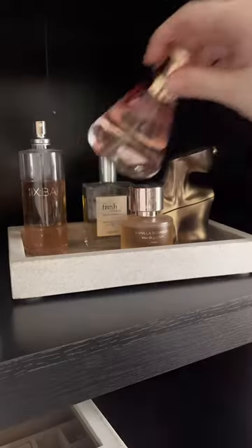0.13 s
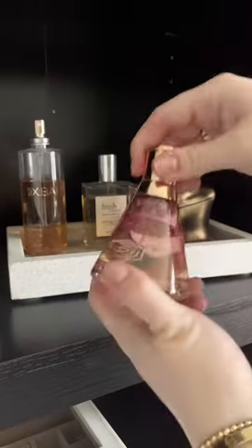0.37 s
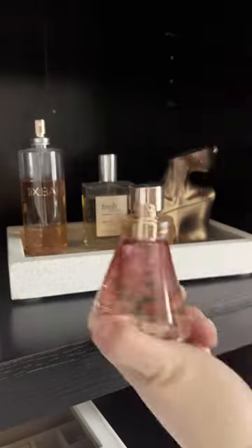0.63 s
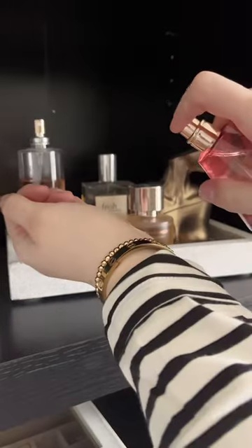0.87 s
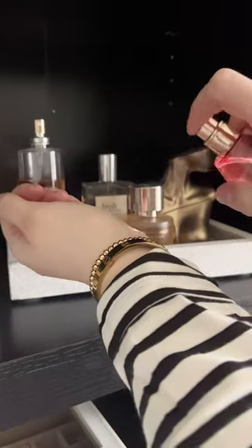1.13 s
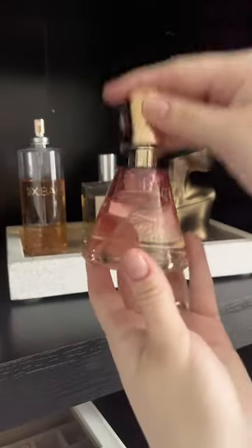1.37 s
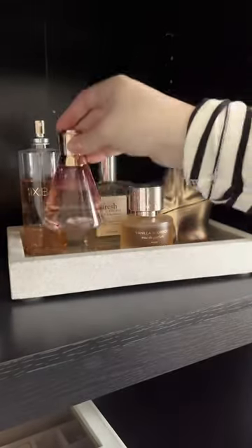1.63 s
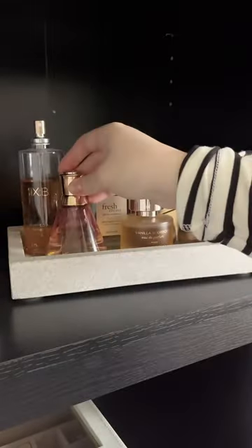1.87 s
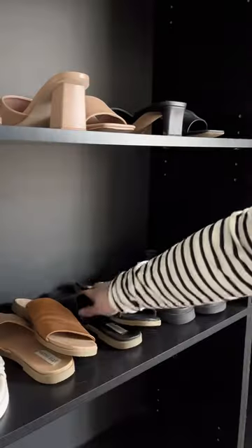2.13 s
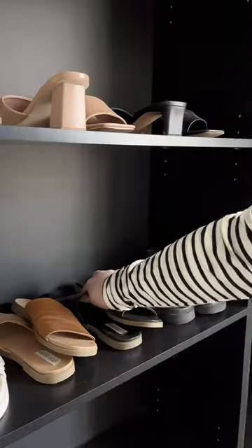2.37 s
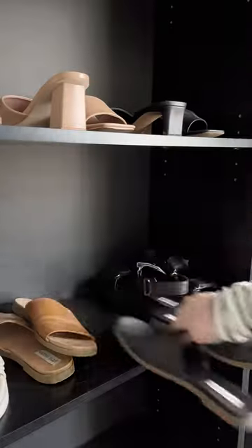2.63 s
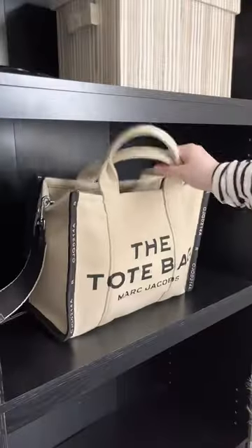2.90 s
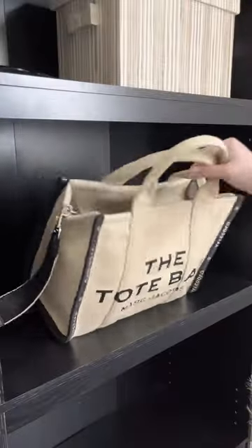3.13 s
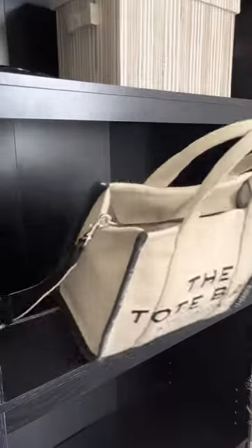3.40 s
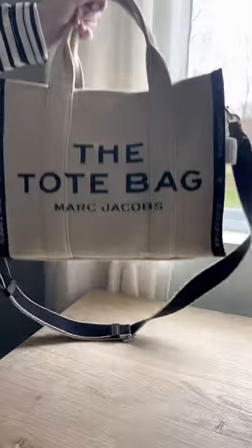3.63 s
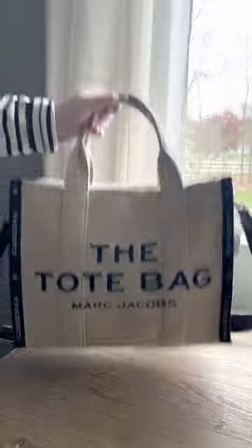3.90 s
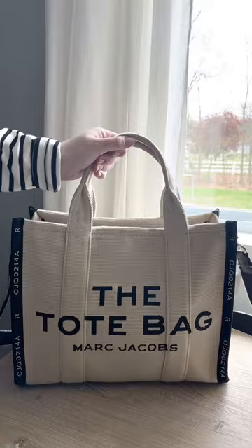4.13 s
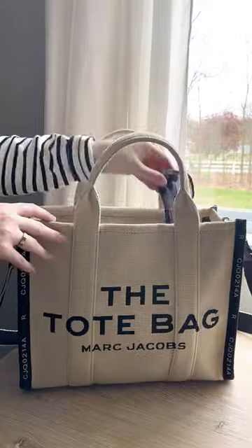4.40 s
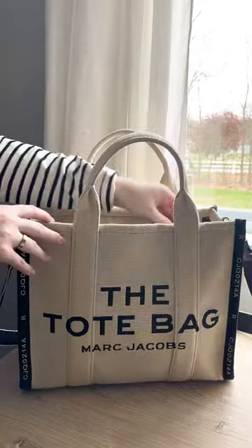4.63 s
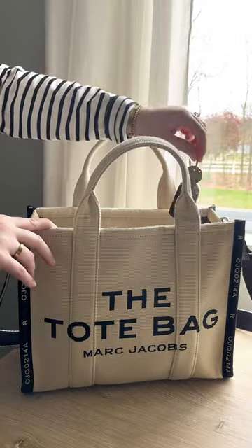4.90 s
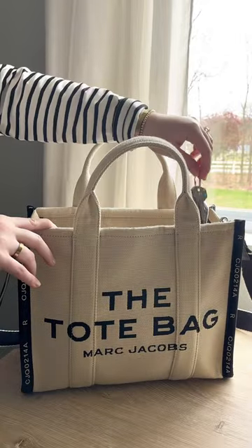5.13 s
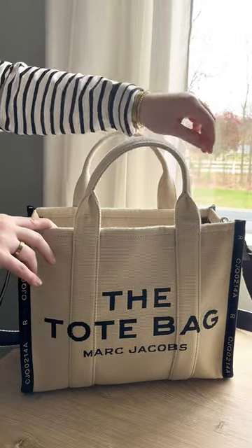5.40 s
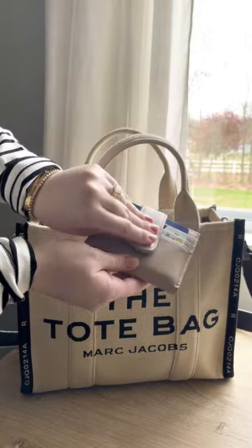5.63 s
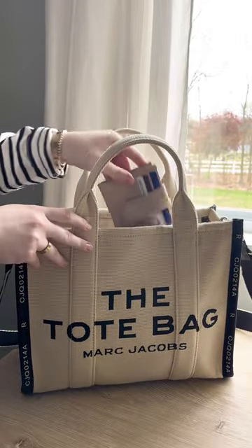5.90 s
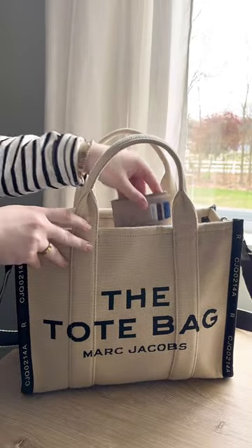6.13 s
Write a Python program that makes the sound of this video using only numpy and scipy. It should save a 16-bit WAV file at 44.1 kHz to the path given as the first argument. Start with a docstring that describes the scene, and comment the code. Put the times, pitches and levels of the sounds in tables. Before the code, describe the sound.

Close, quick-cut indoor handling sounds: perfume bottle uncapped, sprayed, recapped and set down clinking, sandals shuffled, canvas bag scraped and thumped down, keys jingling.

```python
"""A quiet bedroom, close to a phone, in quick cuts: a perfume bottle is lifted, uncapped, sprayed, capped and
set on a wooden tray; sandals and a canvas bag slide off a shelf, the bag lands on a table, glasses, keys and a
wallet go in. Contacts are noise bursts; wood, glass and keys ring as clusters of decaying sines; rubbing is
gritty noise through resonances; the pump is stick-slip pulses, then shaped noise.
Each cut chops the room's tail and has its own hush of rumble, drone and hiss."""
import sys
import numpy as np
from scipy import signal
from scipy.fft import rfft, irfft, next_fast_len
from scipy.io import wavfile
from scipy.ndimage import uniform_filter1d

SR = 44100
rng = np.random.default_rng(int(sys.argv[2]) if len(sys.argv) > 2 else 0)


def volts_from_decibels(level):
    """Turn decibel levels (scalar or array-like) into linear amplitude factors."""
    exponent = np.asarray(level, float) / 20
    return 10 ** exponent


def to_wav(sig):
    """Store sig (one row per channel, or 1-D mono) as 16-bit WAV at the path in sys.argv[1].

    Samples outside -1..1 are clipped; the rate is SR.
    """
    pcm = np.clip(np.atleast_2d(sig), -1, 1) * 32767
    pcm = np.round(pcm).astype(np.int16)
    wavfile.write(sys.argv[1], SR, pcm.T)  # frames by channels


N = 276551  # samples

# shots between cuts: (start [s], end [s], rumble [dB], drone [dB], hiss [dB])
SHOTS = [(0, 0.349, -61, -95, -64.5), (0.353, 0.723, -59, -86, -66.5), (0.725, 1.165, -52, -49, -70.5),
         (1.182, 1.528, -53, -54, -71.5), (1.533, 2, -46.5, -48.5, -62), (2.005, 2.705, -48, -57, -64),
         (2.713, 3.609, -40, -48, -52.5), (3.634, 4.22, -50, -51.5, -67.5), (4.222, 4.725, -52, -56.5, -71),
         (4.731, 5.101, -52, -58.5, -68.5), (5.105, 5.527, -48, -59, -66), (5.533, 5.904, -53.5, -57, -69),
         (5.909, 6.309, -53, -59, -69.5)]
# modes of the tray: (frequency [Hz], level [dB], t60 [s])
TRAY = [(76, -9.5, 0.32), (144, -8, 0.43), (242.2, -3, 0.35), (310, 0, 0.12), (404, -18, 0.21),
        (610, -10.5, 0.15)]
# modes of the shelf: (frequency [Hz], level [dB], t60 [s])
SHELF = [(47.1, -33.5, 0.76), (78.5, -11.5, 0.31), (140.8, -7, 0.3), (207.1, -5, 0.29), (266, 0, 0.23),
         (363, 0.5, 0.097), (467, 0.5, 0.067), (726, -6.5, 0.36)]
# modes of the table: (frequency [Hz], level [dB], t60 [s])
TABLE = [(48, -10.5, 0.23), (80, -17, 0.94), (130, -1, 0.21), (176, -3.5, 0.2), (251, -1, 0.075),
         (331.5, -4.5, 0.3), (389, -3, 0.046), (544.6, -5.5, 0.18), (760, -9, 0.053)]
# wood under the blows and rubs: (from [s], modes)
WOOD = [(0, TRAY), (2, SHELF), (3.62, TABLE)]
# modes of the glass bottles: (frequency [Hz], level [dB], t60 [s])
BOTTLES = [(733, -9, 0.25), (1150, -6, 0.15), (1330, -9, 0.17), (1670, 5, 0.3), (2130, -3, 0.363),
           (2320, -0.5, 0.3), (2695, 1, .45), (2858, 1, 0.35), (3300, -11.5, .3), (3690, 5.5, 0.22),
           (4000, 5.5, 0.28), (4030, 0, 0.4), (4380, -3.5, 0.9), (4846, -8.5, .25), (4860, -5.5, .31),
           (5335, 2, .3), (5700, -15, .15), (6374, -22.5, 0.2), (7671, -23.5, 0.447), (8800, -18.5, .33)]
# modes of the keys: (frequency [Hz], level [dB], t60 [s])
KEYS = [(2150, -24, .04), (2450, -24, .05), (3050, -22, .05), (4050, -22, .05), (4700, -22, .05),
        (6340, -18, .08), (6800, -15, .08), (7140, -14, .15), (8200, -14, .12), (8870, -16, .12),
        (9540, -7, .12), (10400, -6, .05), (11100, -2, .2), (12000, -11, .15), (12900, -14, .12),
        (14800, -12, .12), (15400, -3, .22)]


def along(table, hz):
    """A (Hz, value) table read on a log-frequency axis."""
    f, v = np.transpose(table)
    return np.interp(np.log(hz + 1), np.log(f), v)


def noise(spectrum, size):
    """Noise of rms 1, coloured by (frequency [Hz], relative level [dB])."""
    n = next_fast_len(size)
    gain = volts_from_decibels(along(spectrum, np.fft.rfftfreq(n, 1 / SR)))
    x = irfft(rfft(rng.standard_normal(n)) * gain, n)[:size]
    return x / x.std()


def band(x, hz, width):
    """Resonance with gain 1 at the centre."""
    return signal.lfilter(*signal.iirpeak(hz, hz / width, SR), x)


def steep(x, hz, width):
    """Two equal resonances in series, for dark skirts; each is 1.34 times the nominal width."""
    return band(band(x, hz, 1.34 * width), hz, 1.34 * width)


def walk(rate):
    """Random levels drawn rate times a second, joined by ramps; spread near 1."""
    k = int(SR / rate)
    return uniform_filter1d(np.repeat(rng.standard_normal(N // k + 1), k), k)[:N]


def cut_after(s):
    """When the shot that holds time s ends."""
    return min(end for start, end, *hush_db in SHOTS if end > s)


def add(out, s, x):
    """Mixes x into out at time s, up to the next cut."""
    i, stop = int(s * SR), min(int(cut_after(s) * SR), N)
    out[i:min(i + len(x), stop)] += x[:stop - i]


def curve(table):
    """Columns of a table at every sample, and a gate that is open while it lasts."""
    s, *columns = np.transpose(table)
    t = np.arange(N) / SR
    gate = np.clip(np.minimum(t - s[0], s[-1] - t) / 0.0031, 0, 1)
    return gate, *(np.interp(t, s, c) for c in columns)


def decays(rows, attack_s):
    """Gain that jumps at each (s, dB, t60 s) and dies away, at the latest with the cut."""
    out, t = np.zeros(N), np.arange(SR) / SR
    for s, db, t60 in rows:
        add(out, s, np.minimum(t / attack_s, 1) * volts_from_decibels(db - 60 * t / t60))
    return out


def favour(hz, centre_hz, db_per_octave):
    """Gain in dB, falling as a resonance lies further from the centre of the excitation."""
    return -db_per_octave * np.abs(np.log2(hz / centre_hz))


def blend(resonances, centre_hz, db_per_octave):
    """Mixes (Hz, dB, noise) to about rms 1; nearness to the centre adds to a resonance's share."""
    shares = [volts_from_decibels(db + favour(hz, centre_hz, db_per_octave)) for hz, db, x in resonances]
    mix = sum(share * x / x.std() for share, (hz, db, x) in zip(shares, resonances))
    return mix / np.sqrt(sum(share ** 2 for share in shares))


def ring(s, modes, db, push_ms, scatter_db, spread):
    """One blow: every mode is four close partials that beat; a longer push dulls the high ones."""
    hz, share_db, t60 = np.repeat(np.transpose(modes), 4, axis=1)[:, :, None]
    level_chance, pitch_chance = rng.standard_normal((2, *hz.shape))
    mode_chance = np.repeat(rng.standard_normal(len(modes)), 4)[:, None]
    share_db = share_db + scatter_db * (mode_chance + level_chance)
    t = np.arange(int(min(cut_after(s) - s, .5) * SR)) / SR
    partials = volts_from_decibels(share_db - 60 * t / t60) * np.sin(2 * np.pi * hz * (1 + spread * pitch_chance) * t)
    x = signal.fftconvolve(partials.sum(0), np.hanning(int(push_ms * SR / 1000) + 3))
    return volts_from_decibels(db) * x / np.abs(x).max()


def crack(db, hz, treble_db, body_db, ms):
    """A burst of noise: a broad knock around hz, a fizz of treble and a dull body."""
    t = np.arange(SR // 10) * 1000 / SR / max(ms, .2)
    fade = np.exp(-t) * (1 - np.exp(-t / 0.57))
    first_touch = 5.0 * (t == 0)
    knock = steep(first_touch + fade * rng.standard_normal(len(t)), hz, 0.67 * hz)
    fizz = fade * noise([(3000, -43.0), (6500, 3.5), (13000, 14.5), (16000, 2.5)], len(t))
    body = fade * noise([(200, -27), (500, 6.5), (1200, 4.5), (2500, -41.5)], len(t))
    return volts_from_decibels(db) * knock / np.abs(knock).max() + volts_from_decibels(treble_db) * fizz + volts_from_decibels(body_db) * body


def rattle(modes, shakes, rate, width):
    """Hundreds of tiny collisions a second excite an object's modes; width is a share of the pitch."""
    ticks = (rng.random(N) < rate / SR) * rng.standard_normal(N) * volts_from_decibels(3 * walk(60))
    jingle = sum(volts_from_decibels(db) * band(ticks, hz, width * hz) for hz, db, t60 in modes)
    return decays(shakes, 0.0018) * jingle / jingle.std()


def stereo(shared, other):
    """Stereo image: left and right are partly alike, with a phase between them that varies with pitch."""
    # (frequency [Hz], lead of the left channel [radians])
    left_lead = [(0, 0), (700, -0.3), (1400, -0.2), (1750, 0), (2400, 1.2), (3100, -1), (3900, -0.9),
                 (4500, -1.5), (5170, -4), (5700, -3.2), (6550, -2.4), (7580, -0.4), (8600, 0.5),
                 (9300, 2.3), (9800, 3.05), (10700, 3.5), (11200, 4.4), (12060, 6), (13100, 6.6),
                 (14470, 9.3), (15400, 10.4), (16000, 9.7)]
    # (frequency [Hz], likeness of left and right [0-1])
    likeness = [(60, .998), (130, .99), (280, .95), (640, .55), (1100, .65), (1700, .8), (2200, .55),
                (2700, .1), (3600, .55), (4600, .45), (5200, .5), (5800, .92), (7000, .65), (8200, .87),
                (10200, .96), (16000, .9)]
    n = next_fast_len(len(shared))
    hz = np.fft.rfftfreq(n, 1 / SR)
    alike = np.clip(along(likeness, hz), 0, 1)
    lead = np.exp(-1j * np.interp(hz, *np.transpose(left_lead)))
    right = alike * lead * rfft(shared, n) + np.sqrt(1 - alike ** 2) * rfft(other, n)
    return np.array([shared, irfft(right, n)[:len(shared)]])


def housing():
    """The phone's body scatters the direct sound: a short random response passing all pitches equally."""
    scatter_ms = 2.5
    x = rfft(rng.standard_normal(512) * np.exp(-np.arange(512) * 1000 / SR / scatter_ms))
    return irfft(x / np.abs(x))


def room(direct):
    """Direct sound, scatter off the near shelves, then the room's tail dying band by band."""
    # tail: (frequency [Hz], t60 [s], level [dB])
    tail = [(60, 0.11, -19), (306, 0.44, -6), (990, 0.64, -24), (4640, 0.2, -8), (8000, 1, -28),
            (15890, 0.45, -24)]
    near_db, near_ms = -14, 6
    t = np.arange(SR // 2) / SR
    scatter = noise([(200, -21.0), (800, 9.0), (6000, 4.5), (16000, -36.0)], len(t))
    h = volts_from_decibels(near_db) * np.exp(-t * 1000 / near_ms) * scatter / np.sqrt(near_ms * SR / 2000)
    f, t60, db = np.transpose(tail)
    for hz in 50 * 2 ** np.arange(0, 8.4, .5):  # half octaves
        fade_db = along(np.c_[f, db], hz) - 60 * t / along(np.c_[f, t60], hz)
        tail_band = band(rng.standard_normal(len(t)), hz, hz / 3) / np.sqrt(SR / 20)
        h += volts_from_decibels(fade_db) * np.minimum(t / 0.0028, 1) * tail_band
    h[:len(direct)] += direct
    return np.roll(h, 32)  # headroom for the phase between left and right


def hush():
    """Stereo background: wavering rumble, steady hiss, wavering drone, all coloured noise."""
    # (frequency [Hz], relative level [dB])
    rumble_colour = [(15, -29.5), (25, -5), (92, 4.5), (141, -9.5), (221, -11.5), (343, -22.5), (425, -20),
                     (569, -39.5), (600, -47.5), (780, -60), (1320, -120)]
    # (frequency [Hz], relative level [dB])
    hiss_colour = [(400, 7.5), (1000, 1), (2500, 0.5), (5000, 0.5), (6800, -3.5), (9000, -5),
                   (15000, -14.5)]
    # (frequency [Hz], relative level [dB])
    drone_colour = [(60, -43), (110, -4), (135, 5), (175, 0.5), (220, -20), (320, -46.5)]
    rumble = stereo(noise(rumble_colour, N), noise(rumble_colour, N)) * volts_from_decibels(2 * walk(72))
    hiss = stereo(noise([(150, -10)] + hiss_colour, N), noise([(150, -31.0)] + hiss_colour, N))
    drone = stereo(noise(drone_colour, N), noise(drone_colour, N)) * volts_from_decibels(2 * walk(20))
    return rumble, drone, hiss


def slides():
    """Things dragged, as (pitch centre Hz, course)."""
    # each: pitch centre [Hz], then a course of
    # (time [s], rub [dB], treble [dB], load on the wood [dB], favoured pitch of the wood [Hz])
    bottle = 4300, [(0.0, -67.5, -70, -62, 88.6), (.18, -56, -56.5, -76, 87.5),
              (.195, -52.5, -56.5, -61, 87.5), (0.3, -51.5, -58, -69, 85.5), (0.345, -55.5, -57, -60, 89)]
    # columns as for the bottle
    cap = 3800, [(1.283, -59, -65.5, -58.5, 140.4), (1.303, -44.5, -48, -56.5, 138.6),
           (1.307, -20, -26, -54, 141), (1.325, -22, -25.5, -60, 140), (1.346, -29, -23.5, -59.5, 140),
           (1.357, -34, -52.5, -57, 139.6)]
    # columns as for the bottle
    sandals = 1880, [(2.05, -40.5, -46, -69, 130), (2.086, -49.5, -57, -31.5, 130),
               (2.266, -60.5, -61.5, -68, 130), (2.308, -49, -50.5, -69, 130), (2.33, -55, -55, -43, 130),
               (2.516, -41.5, -45, -55, 130), (2.572, -40.5, -56, -35, 130),
               (2.602, -45.5, -54.5, -31.5, 130), (2.7, -65, -61, -55, 130)]
    # columns as for the bottle
    bag = 950, [(2.714, -26.5, -39.5, -27.5, 245), (2.738, -50, -54, -14, 266),
           (2.761, -45, -50.5, -20, 260), (2.77, -31, -33, -19, 260), (2.796, -43, -63, -37, 239),
           (2.898, -39.5, -42.5, -13.5, 247), (2.97, -54, -87, -26, 179), (3.212, -49.5, -44, -44, 119),
           (3.298, -39, -45.5, -49, 179), (3.388, -33, -45.5, -17, 152), (3.464, -28.5, -47.5, -48, 182),
           (3.522, -28, -45.5, -37, 140), (3.59, -23.5, -46, -31, 192), (3.63, -24.5, -28.5, -23, 187)]
    # columns as for the bottle
    keyring = 9000, [(4.74, -54, -54.5, -59, 115), (4.866, -55.5, -46.5, -49, 115),
               (4.96, -57, -78, -51.5, 115), (4.974, -60, -41, -49, 111), (5.1, -58.5, -54.5, -69, 113)]
    return [bottle, cap, sandals, bag, keyring]


def scuffs():
    """Brushes that swell into contact, as (pitch centre Hz, course)."""
    # (start [s], end [s], final rub [dB], final treble [dB], final load [dB], pitch centre [Hz])
    brushes = [(0.886, 0.92, -30, -56, -63, 3900), (1.75, 1.784, -9, -46.5, -33.5, 4003),
               (3.857, 3.904, -16, -39.5, -14.5, 1100), (4.638, 4.684, -65, -68.5, -28.5, 1000),
               (5.107, 5.199, -36, -36.5, -33, 950), (5.636, 5.647, -29.5, -39.5, -42.5, 3050),
               (6.207, 6.27, -56.5, -57, -44, 1600)]
    rise_db, load_rise_db, boom_hz = 38, 23, 265
    courses = []
    for start, end, db, treble_db, load_db, hz in brushes:
        first = (start, db - rise_db, treble_db - rise_db, load_db - load_rise_db, boom_hz)
        courses.append((hz, [first, (end, db, treble_db, load_db, boom_hz)]))
    return courses


def settling():
    """Things settling after they land (bag, keys, wallet): rubbing dies away while the wood's pitch sags."""
    # (time [s], rub [dB], load [dB], t60 [s], pitch centre [Hz])
    landings = [(3.629, -47, -41.5, 0.22, 957), (3.914, -24.5, -10.5, 0.4, 698),
                (4.042, -39.5, -54, 0.19, 3160), (4.681, -46.5, -27.5, 0.22, 960),
                (5.198, -31, -25.5, 0.37, 3660), (5.656, -32, -43.5, 0.38, 4230)]
    treble_db = -13  # relative to the rub
    boom_hz, settled_boom_hz = 260, 99
    courses = []
    for s, db, load_db, t60, hz in landings:
        cut_s = cut_after(s)
        lost_db = 60 * min((cut_s - s) / t60, 1)
        last_db = db - lost_db
        last = (min(s + t60, cut_s), last_db, last_db + treble_db, load_db - lost_db, settled_boom_hz)
        courses.append((hz, [(s, db, db + treble_db, load_db, boom_hz), last]))
    return courses


def rubbing():
    """Surfaces catch and slip: gritty noise through the rubbed thing's hollow, and a load that shakes the wood."""
    # resonances of the hollow: (frequency [Hz], nominal width [Hz], level [dB])
    rub_body = [(585, 540, 0.5), (950, 280, -3), (1400, 640, -1.5), (1844, 2800, -3), (2630, 780, -1),
                (4030, 1600, 0)]
    grit = volts_from_decibels(3 * walk(300) + 2.5 * walk(40))
    hollows = []
    for hz, width, db in rub_body:
        hollow = steep(grit * rng.standard_normal(N), hz, width)
        hollows.append((hz, db, hollow * volts_from_decibels(2.5 * walk(30))))
    treble = noise([(2500, -22.0), (4500, 3.5), (9000, -3.5), (14000, -4.5), (16000, -21.5)], N)
    treble = treble * volts_from_decibels(4 * walk(200))
    shake, out = rng.standard_normal(N), np.zeros(N)
    booms = {start: [(hz, db, steep(shake, hz, 6.14 / t60)) for hz, db, t60 in wood] for start, wood in WOOD}
    for centre_hz, course in slides() + scuffs() + settling():
        start_s, end_s = course[0][0], course[-1][0]
        boom = booms[max(start for start in booms if start <= start_s)]
        now = slice(int(start_s * SR), int(end_s * SR))
        gate, rub_db, treble_db, load_db, boom_hz = (c[now] for c in curve(course))
        body = blend([(hz, db, x[now]) for hz, db, x in hollows], centre_hz, 4.77)
        wood = blend([(hz, db, x[now]) for hz, db, x in boom], boom_hz, 13.0)
        out[now] += gate * (volts_from_decibels(rub_db) * body + volts_from_decibels(treble_db) * treble[now] + volts_from_decibels(load_db) * wood)
    return out


def taps():
    """Single-mode rings: metallic pings, cap taps and the low sway of the furniture."""
    # (time [s], frequency [Hz], level [dB], t60 [s])
    single_rings = [(0.319, 8630, -51, 0.078), (.322, 11000, -53, .05), (0.556, 12500, -29, 0.23),
                    (0.577, 1240, -34, 0.034), (0.587, 1200, -32, 0.095), (0.647, 12300, -52, 0.2),
                    (1.973, 1150, -38, 0.082), (2.983, 50, -18.5, 0.75), (3.916, 49, -22.5, 1),
                    (5.995, 1043, -60.5, 0.085), (6.146, 1200, -56.5, 0.1)]
    out = np.zeros(N)
    for s, hz, db, t60 in single_rings:
        add(out, s, ring(s, [(hz, 0, t60)], db, push_ms=0.5, scatter_db=1.4, spread=0.04))
    return out


def clicks():
    """Hard contacts, each a burst of noise."""
    # (time [s], knock peak [dB], centre [Hz], treble [dB], body [dB], decay [ms])
    contacts = [(0.3193, -40, 1900, -20.5, -72, 4.8), (0.478, -10.5, 2370, -17.5, -11, 1.6),
                (0.486, -10.5, 1730, -13.5, -15.5, 1.8), (0.555, -49, 1310, -29, -49, 2.4),
                (0.6441, -116, 1270, -34, -73, 3.6), (0.918, -3, 3100, -23, -14, 1.1),
                (0.995, -32, 3680, -25.5, -86, 2.5), (1.077, -32.5, 3880, -51.5, -61, 3.9),
                (1.11, -36, 3856, -52.5, -74, 6.5), (1.305, -1.5, 4160, -11, -17.5, 3.5),
                (1.3134, -1.5, 1700, -3.5, -19.5, 1.2), (1.3314, 4, 2960, -28.5, -33.5, 1),
                (1.3342, -6, 2960, -20, -27.5, 1.4), (1.3424, -0.5, 3000, -15, -15.5, 0.67),
                (1.5703, -22, 3370, -81, -33.5, 3.9), (1.607, -25, 3300, -42.5, -27.5, 4.8),
                (1.704, -29.5, 3900, -47.5, -43.5, 3.5), (1.7805, 4.5, 4200, -44.5, -15, 1.9),
                (2.05, -36, 1820, -36.5, -55, 1.2), (2.069, -26, 2500, -39, -27, 2.5),
                (2.105, -25.5, 1480, -48, -45, 1.2), (2.2139, -40.5, 1000, -55, -43, 3.1),
                (2.3315, -43, 1210, -61.5, -37, 4), (2.382, -35.5, 1160, -56, -49, 3),
                (2.299, -30.5, 1590, -52, -53, 3.2), (2.5541, -25, 1270, -58.5, -39.5, 5.1),
                (2.6129, -21, 3400, -59, -33, 4.4), (2.7182, -23, 1570, -45.5, -27.5, 5.4),
                (2.766, -10.5, 3930, -14.5, -43, 1.8), (2.84, -44, 1570, -46.5, -22, 1.1),
                (2.885, -16, 1950, -47, -21, 7.1), (3.3238, -19.5, 1280, -53, -13.5, 2.7),
                (3.3716, -44, 1276, -38, -15.5, 2.1), (3.8832, -10.5, 1165, -48, -4.5, 1.1),
                (3.9056, -1, 1740, -46.5, 3, 2.5), (4.0481, -43, 1400, -29, -30.5, 1.3),
                (4.6733, -40.5, 1220, -59, -18, 1.4), (5.1668, -31.5, 1516, -35.5, -48, 1.4),
                (5.1922, -32, 2560, -23.5, -23.5, 2.7), (5.2618, -14.5, 4260, -33.5, -33, 1.7),
                (5.534, -54.5, 4040, -73.5, -89, 1.8), (5.542, -46, 4100, -60.5, -81, 1.13),
                (5.561, -35.5, 3870, -66, -77, 0.73), (5.6531, 2, 3670, -11, -2, 1.3),
                (5.896, -55, 3590, -70.5, -66, 1.4)]
    out = np.zeros(N)
    for s, *row in contacts:
        add(out, s, crack(*row))
    return out


def thumps():
    """Soft blows that set the modes of the wood booming, most of all near a favoured pitch."""
    # (time [s], peak [dB], push [ms], favoured pitch [Hz])
    soft_blows = [(0.476, -29, 0.69, 82), (0.919, -40.5, 1.2, 267), (1.324, -25, 2.2, 140),
                  (1.577, -15.5, 2, 320), (1.608, -19, 2.6, 295), (1.712, -17.5, 2.2, 308),
                  (1.787, -13, 0.81, 222), (2.066, -30, 2.3, 134), (2.213, -25.5, 0.52, 91),
                  (2.334, -28.5, 1.8, 260), (2.564, -18, 1.06, 89), (2.723, -25.5, 0.9, 263),
                  (2.835, -14.5, 0.78, 265), (2.902, -20.5, 0.98, 260), (2.978, -6.5, 1.27, 175),
                  (3.331, -14.5, 2.2, 348), (3.377, -8, 1.9, 135.4), (3.874, -20, 1.4, 263.5),
                  (3.909, -2.5, 0.27, 510), (3.919, -4, 3.4, 138.5), (4.667, -24, 1.6, 322),
                  (5.114, -32, 0.66, 98.8), (5.169, -20.5, 0.43, 504), (5.188, -16.5, 1.1, 262),
                  (5.195, -16.5, 0.55, 500), (5.646, -37.5, 0.86, 359), (6.013, -39, 1.33, 121.6),
                  (6.13, -36, 1.73, 109)]
    out = np.zeros(N)
    for s, db, push_ms, centre_hz in soft_blows:
        wood = [wood for start, wood in WOOD if start <= s][-1]
        modes = [(hz, share_db + favour(hz, centre_hz, 11.0), t60) for hz, share_db, t60 in wood]
        add(out, s, ring(s, modes, db, push_ms, scatter_db=0.99, spread=0.039))
    return out


def pump():
    """The plunger creaks in stick-slip pulses, then the nozzle hisses."""
    # (start [s], end [s], level [dB], slip rate [1/s])
    creaks = [(0.728, 0.746, -23, 140), (0.757, 0.758, -30, 100), (0.7995, 0.865, -19, 97),
              (0.874, 0.895, -19, 98)]
    # resonances: (frequency [Hz], nominal width [Hz], level [dB])
    plunger = [(1800, 600, -9), (2800, 900, 0), (4300, 900, -1), (10500, 3000, -26.5)]
    # (time [s], level [dB], t60 [s])
    sprays = [(.918, -22, 0.16)]
    slip_jitter, slip_ms = .04, 2.9
    slips = np.zeros(N)
    for start, end, db, rate in creaks:
        size = int((end - start) * SR)
        phase = np.cumsum(rate * (1 + slip_jitter * walk(90)[:size])) / SR
        pulses = np.diff(np.floor(phase + 1), prepend=0)  # one at each whole turn
        add(slips, start, volts_from_decibels(db) * pulses * volts_from_decibels(3.0 * walk(213.3)[:size]))
    grind_fade = np.exp(-np.arange(600) * 1000 / SR / slip_ms)
    grind = np.convolve(slips, grind_fade)[:N] * rng.standard_normal(N)
    creak = sum(volts_from_decibels(db) * steep(slips + volts_from_decibels(-14) * grind, hz, width) for hz, width, db in plunger)
    hiss = noise([(800, -2.0), (2500, 8.0), (4500, 13.5), (6500, 10.0), (12000, 10.0), (16000, 0.5)], N)
    return creak + decays(sprays, 0.0034) * hiss


def bottle_knocks():
    """Knocked glass: short pushes ring the bottle modes."""
    # (time [s], peak [dB])
    knocks = [(1.568, -36.5), (1.603, -47), (1.778, -8.5), (1.798, -6), (1.86, -21.5), (1.888, -22)]
    out = np.zeros(N)
    for s, db in knocks:
        add(out, s, ring(s, BOTTLES, db, push_ms=.05, scatter_db=2, spread=0.012))
    return out


def bottle_chatter():
    """Bottles chatter against each other on the shaken tray, in dense random collisions."""
    # (time [s], level [dB], t60 [s])
    chatter = [(1.781, -11, 0.042), (1.799, -31, 0.59)]
    return rattle(BOTTLES, chatter, rate=900, width=0.015)


def scrape():
    """The bag's stiff base scrapes over the shelf edge: coarse grit knocks its modes, each waxing and waning."""
    # shriller as less of the base rests there: (time [s], level [dB], favoured pitch [Hz])
    course = [(3.15, -55, 1000), (3.2, -35, 1250), (3.26, -47, 1000), (3.318, -47, 900), (3.33, -35, 900),
              (3.42, -26, 950), (3.44, -23, 1100), (3.46, -23, 850), (3.497, -23, 1790), (3.53, -20, 1110),
              (3.556, -19.5, 1310), (3.575, -23, 1316), (3.59, -21, 1900), (3.63, -41, 1520)]
    # modes: (frequency [Hz], nominal width [Hz], level [dB])
    bag_base = [(728, 165, 0), (973, 64, -6.5), (1213, 61, -3), (1466, 100, -3.5), (1840, 120, -2),
                (2097, 200, 4), (2320, 170, -3.5), (2800, 170, -1.5), (3100, 140, -15), (4220, 250, -14.5)]
    gate, db, centre_hz = curve(course)
    grit = volts_from_decibels(5 * walk(250) + 3 * walk(70)) * rng.standard_normal(N)
    modes = [(hz, share_db, steep(grit, hz, width) * volts_from_decibels(2 * walk(40))) for hz, width, share_db in bag_base]
    return gate * volts_from_decibels(db) * blend(modes, centre_hz, 16.0)


def key_rattle():
    """The bunch of keys rattles after each shake, in dense random collisions."""
    # (time [s], level [dB], t60 [s])
    shakes = [(4.743, -40, 0.58), (4.86, -34.5, 0.19), (4.973, -54.5, 0.53), (5.101, -48.5, 0.69),
              (5.161, -34.5, 0.2), (5.195, -17, 0.21)]
    return rattle(KEYS, shakes, rate=720, width=.035)


def key_jingle():
    """Keys strike each other: high-passed metal modes and a crack at each strike."""
    # (time [s], ring peak ahead of the high-pass [dB], crack peak [dB], crack centre [Hz])
    strikes = [(4.7448, -19, -34, 2380), (4.7746, -21, -38.5, 2300), (4.7984, -22.5, -42, 2800),
               (4.819, -26.5, -34, 6500), (4.8367, -21, -29, 3520), (4.851, -36.5, -33, 3000),
               (4.8607, -15, -27.5, 7040), (4.8853, -21, -31, 6400), (4.923, -38, -43, 1320),
               (4.9712, -29.5, -21, 3100), (4.978, -32, -15, 4630), (4.996, -40, -23, 3300),
               (5.007, -32, -18.5, 4000), (5.0445, -31.5, -23, 4510), (5.0577, -41.5, -31.5, 2430),
               (5.072, -41, -39, 2470), (5.189, -17.5, -16, 3180), (5.1937, -9, -16, 9000),
               (5.2042, -16, -31, 4500)]
    rings, cracks = np.zeros(N), np.zeros(N)
    for s, db, crack_db, crack_hz in strikes:
        add(rings, s, ring(s, KEYS, db, push_ms=0, scatter_db=4.5, spread=.006))
        add(cracks, s, crack(crack_db, crack_hz, crack_db - 14, crack_db - 36, ms=2.5))
    return cracks + signal.sosfilt(signal.butter(2, 1200, "high", fs=SR, output="sos"), rings)


def scene():
    """Every shot has its own echo pattern and hush, and ends abruptly."""
    dry = rubbing() + taps() + clicks() + thumps() + pump() + bottle_knocks() + bottle_chatter()
    dry += scrape() + key_rattle() + key_jingle()
    layers = hush()
    out = np.zeros((2, N))
    for start, end, *layer_dbs in SHOTS:
        a, b = int(start * SR), min(int(end * SR), N)
        echoes = stereo(room([1]), room(housing()))
        heard = signal.fftconvolve(dry[None, a:b], echoes, axes=1)[:, 32:b - a + 32]  # undo the headroom
        for layer, db in zip(layers, layer_dbs):
            heard += volts_from_decibels(db) * layer[:, a:b]
        edge_s = np.minimum(np.arange(b - a) + 1, np.arange(b - a)[::-1] + 1) / SR
        out[:, a:b] = heard * np.minimum(edge_s / 0.0021, 1)
    return out


def roll_off(x):
    """The treble ends steeply here."""
    return signal.sosfilt(signal.butter(12, 16470, fs=SR, output="sos"), x)


def record(dry):
    """The phone cuts the deepest bass and the top, and clips the loudest peaks."""
    x = signal.sosfilt(signal.butter(3, 38, "high", fs=SR, output="sos"), dry)
    x = signal.sosfilt(signal.ellip(8, .2, 70, 16300, fs=SR, output="sos"), x)
    return roll_off(np.clip(x, -1, 1))


dry = scene()
out = record(dry)
to_wav(out)
```